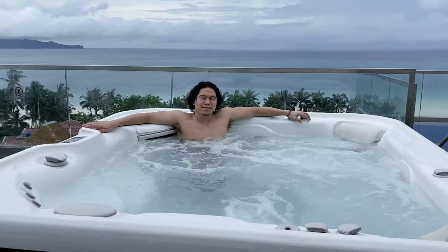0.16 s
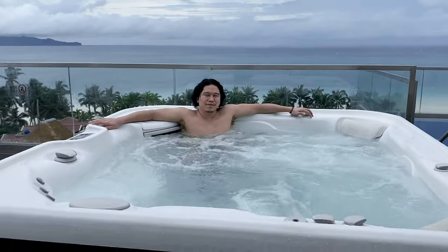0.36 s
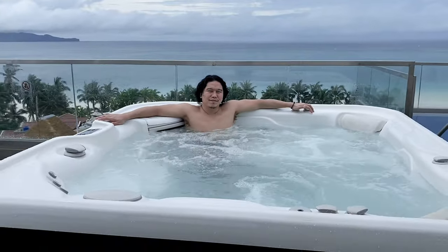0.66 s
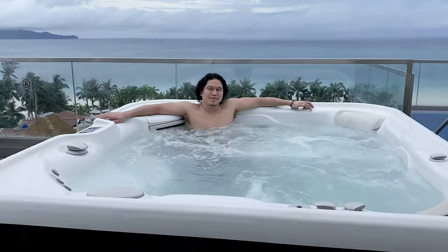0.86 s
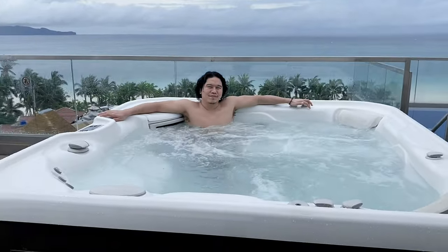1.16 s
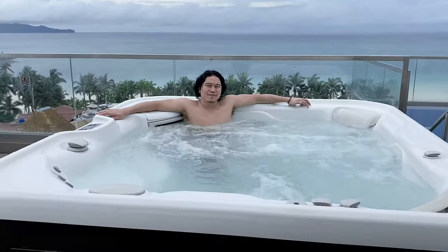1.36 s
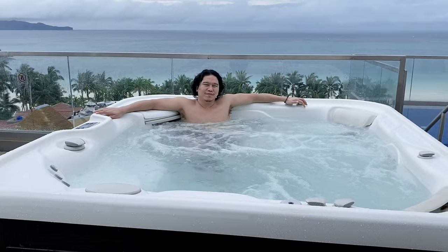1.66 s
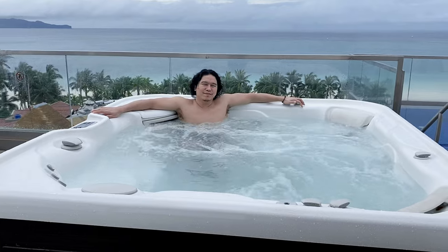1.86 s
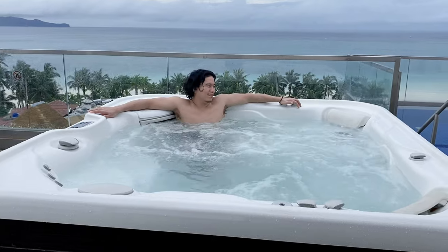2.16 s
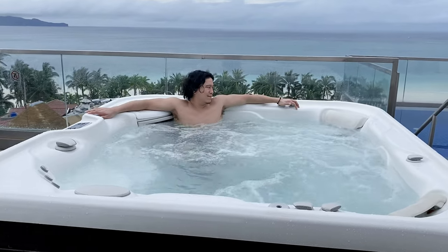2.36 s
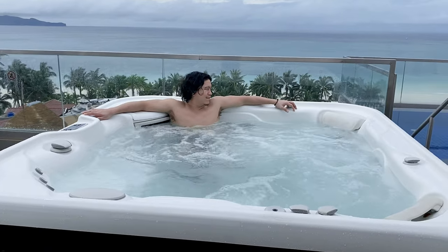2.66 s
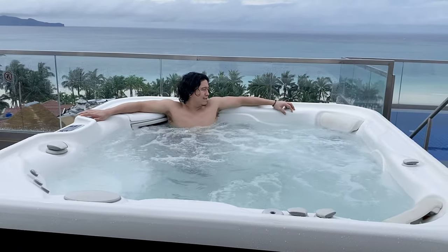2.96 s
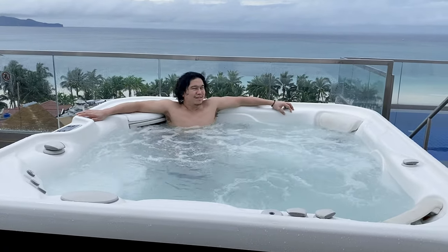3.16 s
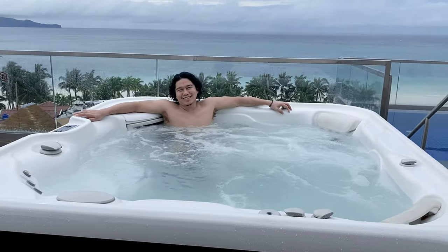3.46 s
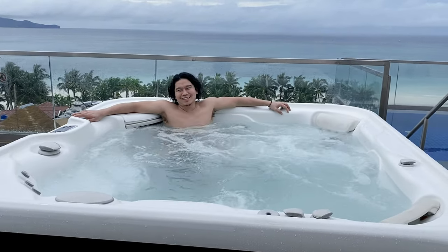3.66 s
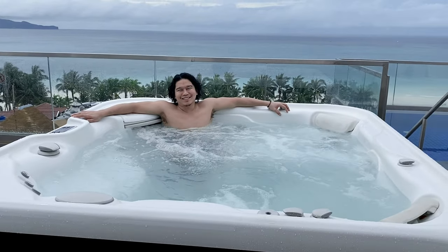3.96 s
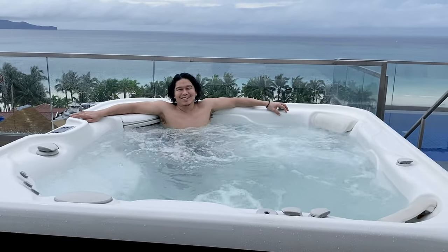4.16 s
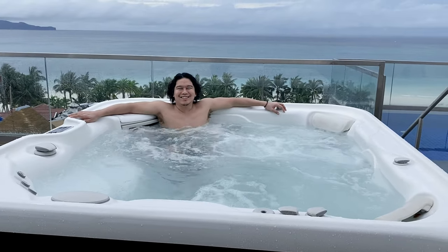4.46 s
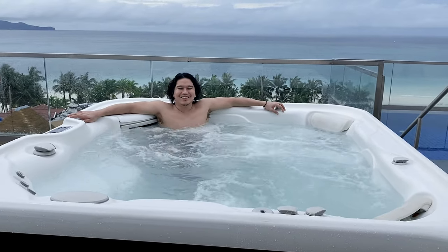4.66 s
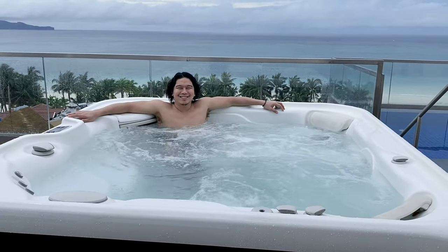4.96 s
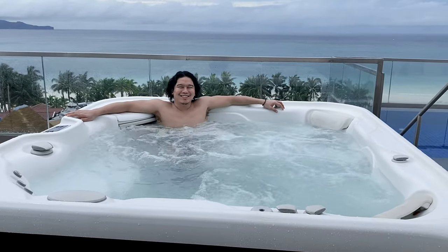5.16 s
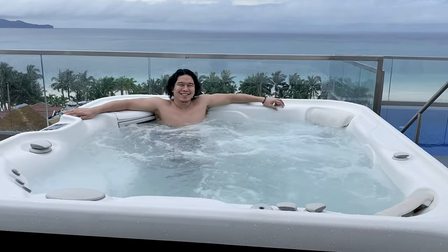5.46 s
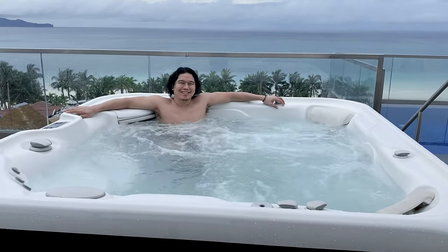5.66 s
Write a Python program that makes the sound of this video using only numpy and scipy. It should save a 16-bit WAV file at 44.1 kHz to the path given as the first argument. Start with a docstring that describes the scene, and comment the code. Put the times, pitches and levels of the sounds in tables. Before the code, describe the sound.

A running hot tub on an open deck is heard close up in stereo for about six seconds. A strong, low electrical pump hum, with weak overtones and faint wavering whines, continues throughout beneath dense rushing water, gurgling froth and a dull boom and rumble from the shell. Fine spray adds a quiet, slowly thinning fizz. Bubbles plop near 0.2 and 0.9 s, with tiny spits of spray near 0.2 and 2.0 s. The churn slackens around 2.5 s, while a distant engine drones low from about 2.2 to 3.2 s, its upper tones gliding slightly upward before fading. The jets are strong again by 3.4 s, and a breathy nozzle whistle peaks near 3.5 s. A livelier cluster of plops comes at 4.2-4.8 s, the loudest around 4.4 s, followed by more near 5.4 s and small spits at 5.05 and 5.3 s. The churn and hum continue to the end, easing slightly.

```python
"""Jets churn a hot tub on an open deck: dense clicks make the rush, ringing clicks the gurgle. The pump hums at
twice the mains and whines at its blade rate; the shell booms and rumbles; spray fizzes. All these run throughout.
Single bubbles and spits of spray sound from 0.2 s on. Near 2.5 s the jets slacken; from 2.2 to 3.2 s a far engine
drones in gliding sines; a nozzle whistle peaks at 3.5 s and the jets are strong again. Two close ports listen."""
import sys
import numpy as np
from scipy import signal
from scipy.fft import rfft, irfft
from scipy.io import wavfile

SR = 44100
rng = np.random.default_rng(int(sys.argv[2]) if len(sys.argv) > 2 else 0)


def to_wav(s):
    """Save 16-bit WAV."""
    ch = np.atleast_2d(s).T  # columns
    pcm = np.round(np.clip(ch, -1, 1) * 32767)  # PCM
    wavfile.write(sys.argv[1], SR, pcm.astype(np.int16))


N = 255780
HUM_HZ = 119.8   # twice the mains


def from_db(db):
    """Amplitude gain of a level in dB."""
    return 10 ** (np.asarray(db) / 20)


def rms_one(x):
    """Scale to rms 1."""
    return x / np.sqrt(np.mean(x ** 2) + 1e-20)


def in_time(rows):
    """Interpolate a (time, level) table to every sample."""
    time_s, level_db = np.transpose(rows)
    return np.interp(np.arange(N) / SR, time_s, level_db)


def at_hz(points, hz, column=1):
    """Interpolate a table column over log frequency."""
    points = np.array(points)
    return np.interp(np.log(hz + 1), np.log(points[:, 0]), points[:, column])


def drift(rate_hz):
    """Slow random wander about zero, spread 1: noise through two equal poles at rate_hz."""
    step = 40   # samples per point of the wander
    r = np.exp(-2 * np.pi * rate_hz * step / SR)
    noise = rng.standard_normal(N // step + 2002)
    slow = signal.lfilter([1], [1, -2 * r, r * r], noise)[2000:]   # drop the filter's start
    return np.interp(np.arange(N) / step, np.arange(len(slow)), rms_one(slow - slow.mean()))


def ring(x, hz, width_hz):
    """Two-pole resonance; a unit click rings at about height 1."""
    r, w = np.exp(-np.pi * width_hz / SR), 2 * np.pi * hz / SR
    return signal.lfilter([0, np.sin(w)], [1, -2 * r * np.cos(w), r * r], x + 1e-18)


def ring_twice(hz, width_hz):
    """Noise through the same resonance twice: a wavering tone of rms 1."""
    noise = rng.standard_normal(N)
    return rms_one(ring(ring(noise, hz, width_hz), hz, width_hz))


def grains(per_s, spread_db):
    """Two unrelated swarms of random clicks, uneven in size; rms 1."""
    size_db = spread_db * np.minimum(rng.exponential(1, (2, N)), 5)
    clicks = from_db(size_db) * rng.choice([-1, 1], (2, N))
    return rms_one(clicks * (rng.random((2, N)) < per_s / SR))


def coloured(drive, spectrum, shared_db, own_db, rate_hz):
    """Split the drive into narrow bands that flicker together and alone, then shape the spectrum; rms 1."""
    out, together = 0, drift(rate_hz)
    edges = np.geomspace(spectrum[0][0], min(spectrum[-1][0], .45 * SR), len(spectrum) + 2)
    for k, (low, high) in enumerate(zip(edges, edges[1:])):
        band_pass = signal.butter(2, [low, high], "band", fs=SR, output="sos")
        shifted = np.roll(drive, 7919 * (k % 2), axis=1)   # neighbouring bands take other stretches
        band = signal.sosfilt(band_pass, shifted)
        out = out + band * from_db(shared_db * together + own_db * drift(rate_hz))
    gain = from_db(at_hz(spectrum, np.fft.rfftfreq(N, 1 / SR)))
    return rms_one(irfft(rfft(out) * gain, N))


def ports(pair, likeness, lead_rad, right_db):
    """Left port hears the first signal; right hears it shifted in phase and mixed with the second."""
    alike = np.clip(likeness, 0, 1)
    first, second = rfft(pair)
    mixed = alike * np.exp(1j * lead_rad) * first + np.sqrt(1 - alike ** 2) * second
    return np.array([pair[0], irfft(mixed * from_db(right_db), N)])


def vigour():
    """Swing of the jets about their mean [dB]; it drives rush, bubbles, rumble and spray."""
    # level of the churn: (time [s], level [dB])
    jets_level = [(0.0, -36), (.4, -36), (.7, -37), (.95, -38), (1.3, -37), (1.7, -36.5), (2.1, -38.5),
                  (2.5, -41), (2.9, -39), (3.4, -36), (3.95, -38), (4.6, -36.5), (5.0, -37.5), (5.4, -37.5),
                  (5.8, -38.5)]
    db = in_time(jets_level)
    return db - db.mean()


def rush():
    """Jets tear the water into a dense swarm of clicks, coloured as churn."""
    # churn colour: (frequency [Hz], level [dB per Hz])
    churn_colour = [(200, -12), (350, -1), (600, 1), (900, -1.5), (1300, -5), (2100, -10), (2600, -14),
                    (3600, -16.5), (5200, -20), (6500, -29), (9000, -36)]
    clicks = grains(12000, spread_db=2.5)
    water = coloured(clicks, churn_colour, shared_db=.5, own_db=1.2, rate_hz=12)
    return from_db(-38 + 0.65 * vigour()) * water   # follows part of the jets' swing


def bubbles():
    """Air pockets come in clumps; each rings a few cycles at one of 18 pitches over a decade."""
    cycles = 18   # resonance frequency over its width
    clicks = grains(350 * from_db(3.5 * drift(8)), spread_db=2.0)
    dealt = rng.integers(0, 18, (2, N))   # pitch number of each click
    froth = 0
    for k, hz in enumerate(np.geomspace(330, 3300, 18)):
        froth = froth + ring(clicks * (dealt == k), hz, hz / cycles) * hz ** -.7
    return from_db(-43 + 1.1 * vigour()) * rms_one(froth)


def rim(x):
    """An inverted echo off the far rim combs the churn into broad humps."""
    delay_s, share = 0.00207, -0.052
    return x + share * np.roll(x, round(delay_s * SR), axis=1)


def plops():
    """Loud single bubbles: dying sines that rise slightly in pitch."""
    # (time [s], level before decay [dB], starting pitch [Hz])
    bubble_rows = [(.182, -33, 890), (.235, -33, 2190), (.859, -34, 640), (2.1, -40, 2100),
                   (3.3, -35, 1130), (3.472, -39, 1850), (4.215, -33, 684), (4.313, -36, 1325),
                   (4.39, -32, 1050), (4.44, -27.5, 723), (4.54, -37, 1660), (4.809, -32, 1050),
                   (5.395, -33, 754), (5.41, -40, 2010), (5.52, -40, 1460)]
    decay_s, rise, attack_s = .013, .02, 0.00099
    out, t = np.zeros(N), np.arange(round(.08 * SR)) / SR
    envelope = np.exp(-t / decay_s) * np.minimum(t / attack_s, 1)
    for start_s, db, hz in bubble_rows:
        at = round(start_s * SR)
        tone = np.sin(2 * np.pi * hz * t * (1 + rise * t / decay_s))
        out[at:at + len(t)] += from_db(db) * (tone * envelope)[:N - at]
    return out


def pump():
    """Magnetic hum at twice the mains with overtones, plus whines that waver in the water."""
    # hum: (time [s], level [dB])
    hum_level = [(0.0, -26.5), (.3, -26.5), (.85, -29), (1.35, -26), (1.7, -26.5), (2.1, -30), (2.5, -29.5),
                 (2.9, -28), (3.4, -26), (3.7, -26), (3.95, -28.5), (4.3, -26.5), (4.9, -26), (5.8, -28)]
    # (multiple of the hum [-], level relative to the hum [dB])
    overtones = [(2.0, -18.5), (3.0, -27.5)]
    # whine at the blade rate: (frequency [Hz], width per resonance [Hz], level [dB])
    blade = (581, 5, -52)
    # other pump and nozzle tones: (frequency [Hz], width per resonance [Hz], level [dB])
    whines = [(403, 5.8, -58.5), (99.4, 13, -47), (2183, 40, -61)]
    turn = 2 * np.pi * HUM_HZ * np.arange(N) / SR
    hum = np.sin(turn)
    for multiple, level_db in overtones:
        hum = hum + from_db(level_db + 1.0 * drift(2.0)) * np.sin(multiple * turn)
    out = np.sqrt(2) * from_db(in_time(hum_level) + .4 * drift(4.4)) * hum
    for hz, width_hz, db in [blade] + whines:
        out += from_db(db + 1.4 * drift(2.4)) * ring_twice(hz, width_hz)
    return out


def whistle():
    """Breathy nozzle whistle: hiss through a broad resonance, swelling and fading."""
    # (time [s], level [dB])
    whistle_level = [(0.0, -58), (1.0, -54), (2.5, -65), (2.85, -51), (3.5, -47), (3.8, -54), (4.7, -51),
                     (5.8, -55)]
    return from_db(in_time(whistle_level)) * ring_twice(1130, width_hz=170)


def shell():
    """The tub shell, shaken by pump and jets, booms and rumbles: coloured noise."""
    # boom level: (time [s], level [dB])
    boom_level = [(0.0, -39.5), (1.6, -39), (2.0, -43), (2.9, -47), (3.3, -40), (3.6, -38.5), (4.2, -41),
                  (4.8, -39), (5.8, -41.5)]
    # boom colour: (frequency [Hz], level [dB per Hz])
    boom_colour = [(25, -30), (35, -21), (50, -0.5), (70, 4.5), (110, -1.5), (140, -4.5), (200, -33)]
    # rumble colour: (frequency [Hz], level [dB per Hz])
    rumble_colour = [(90, 7.5), (130, 0.5), (170, 0), (215, 1), (290, 0.5), (370, -9.5), (450, -11),
                     (700, -15.5)]
    boom = coloured(rng.standard_normal((2, N)), boom_colour, shared_db=1.0, own_db=2.3, rate_hz=3.7)
    rumble = coloured(rng.standard_normal((2, N)), rumble_colour, shared_db=0.0, own_db=.9, rate_hz=7.7)
    return from_db(in_time(boom_level)) * boom + from_db(-33.5 + 0.35 * vigour()) * rumble


def fizz():
    """Spray: a dense swarm of droplet clicks, treble-coloured, that thins slowly."""
    # spray colour: (frequency [Hz], level [dB per Hz])
    spray_colour = [(3500, -20), (5500, -5), (7500, 0), (10000, -.7), (12500, -4.2), (14000, -4.8),
                    (18000, -7)]
    fade_db_per_s = -0.15
    db = -51.5 + 0.36 * vigour() + fade_db_per_s * np.arange(N) / SR
    drops = grains(15000, spread_db=2.5)
    return from_db(db) * coloured(drops, spray_colour, shared_db=0.4, own_db=1.2, rate_hz=18)


def spits():
    """Spits of spray: short puffs of hiss around their own pitch."""
    # (time [s], rms level before the envelope [dB], centre [Hz])
    puff_rows = [(.238, -43, 8000), (1.982, -44, 11000), (2.045, -46, 7500), (3.167, -49, 10600),
                 (5.05, -42, 11000), (5.3, -47, 10000)]
    decay_s, attack_s = 0.012, 0.0049
    out, t = np.zeros((2, N)), np.arange(round(0.061 * SR)) / SR
    envelope = np.exp(-t / decay_s) * np.minimum(t / attack_s, 1)
    for start_s, db, hz in puff_rows:
        at = round(start_s * SR)
        noise = rng.standard_normal((2, len(t)))
        puff = rms_one(ring(noise, hz, .5 * hz)) * envelope
        out[:, at:at + len(t)] += from_db(db) * puff[:, :N - at]
    return out


def far_engine():
    """Low sines that swell, glide and fade."""
    # (start [s], length [s], swell [s], starting pitch [Hz], final pitch [Hz], level [dB])
    drones = [(2.16, .6, .1, 259.5, 280, -37), (2.16, .52, .18, 140, 149.5, -37),
              (2.44, .75, .22, 58.9, 58.4, -34.5)]
    fall_s, bend = .05, 3.5   # the glide quickens by the power bend
    out, t = np.zeros(N), np.arange(N) / SR
    for start_s, length_s, swell_s, from_hz, to_hz, db in drones:
        progress = np.clip((t - start_s) / length_s, 0, 1)
        hz = from_hz + (to_hz - from_hz) * progress ** bend
        fade = np.clip(np.minimum((t - start_s) / swell_s, (start_s + length_s - t) / fall_s), 0, 1)
        tone = np.sin(2 * np.pi * np.cumsum(hz) / SR)
        out += np.sqrt(2) * from_db(db + .4 * drift(7.8)) * fade * tone
    return out


def scene():
    """Water and shell reach the ports along one set of paths; the single sources take the same lead with a
    further lag at the right port; the spray comes from the side."""
    # paths to the ports: (frequency [Hz], likeness [0-1], right lead [rad], right level [dB])
    port_paths = [(40, .995, -.1, 0.4), (100, .995, -.16, -.3), (330, .95, -.16, 0.5), (800, .7, -.4, -3.8),
                  (1100, .3, -.3, -4.4), (1500, .62, 1.1, -1.6), (2100, .85, .2, -3),
                  (3200, .66, -1.0, -4.5), (5500, .25, -.8, -3.8)]
    hz = np.fft.rfftfreq(N, 1 / SR)
    likeness, lead_rad, right_db = (at_hz(port_paths, hz, column=k) for k in (1, 2, 3))
    churn = rim(rush() + bubbles())
    water = ports(shell() + churn, likeness, lead_rad, right_db)

    # single sources lie off to the left: the right port lags more from 1.25 times the hum upwards
    sideways_s = -.00012
    sideways_rad = 2 * np.pi * np.maximum(hz - 1.25 * HUM_HZ, 0) * sideways_s
    points = (pump() + whistle() + far_engine() + plops()) * [[1], [0]]
    # the second signal is silent, so 0.9 only scales the right port
    single = ports(points, 0.9, lead_rad + sideways_rad, right_db)

    spray_lead_s, spray_turns = 12.2 / SR, 0.18   # lead of the right port, extra turns of phase
    spray_rad = 2 * np.pi * (hz * spray_lead_s + spray_turns)
    return water + single + ports(fizz() + spits(), 0.87, spray_rad, .05)


def record(dry):
    """Cut the deep bass below 41 Hz and, steeply, the top towards 15.75 kHz."""
    bass_cut = signal.sosfilt(signal.butter(3, 41, "high", fs=SR, output="sos"), dry)
    top_cut = signal.cheby2(24, 50, 15750, fs=SR, output="sos")   # 50 dB down from 15750 Hz
    return signal.sosfilt(top_cut, bass_cut)


dry = scene()
out = record(dry)
to_wav(out)
```